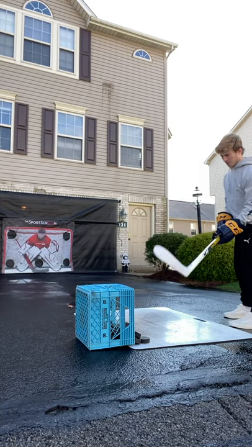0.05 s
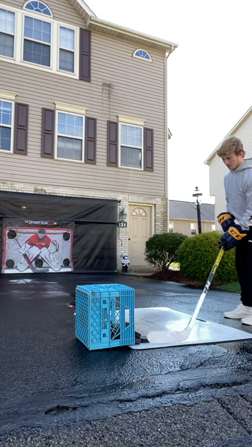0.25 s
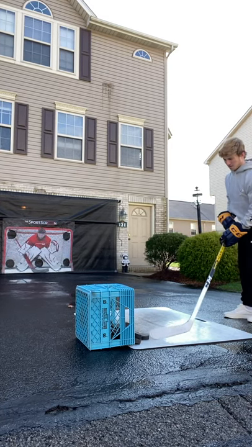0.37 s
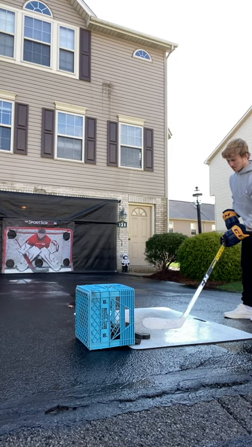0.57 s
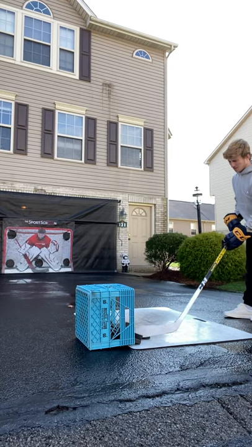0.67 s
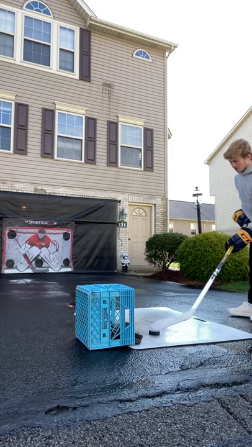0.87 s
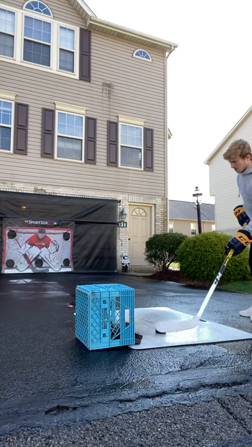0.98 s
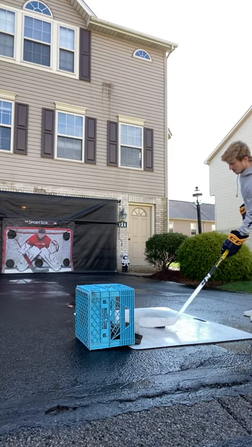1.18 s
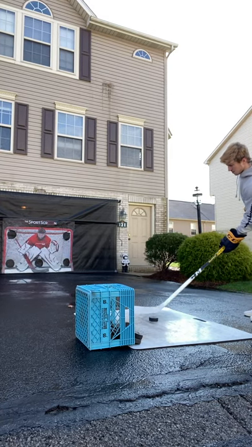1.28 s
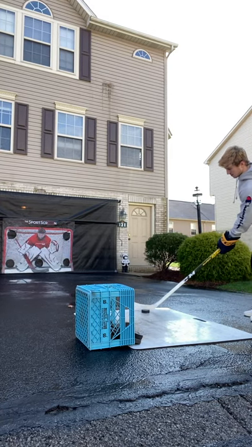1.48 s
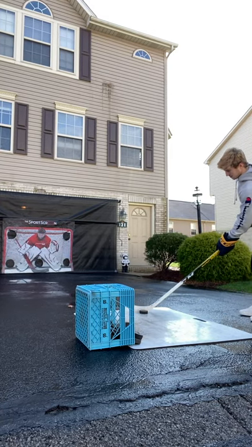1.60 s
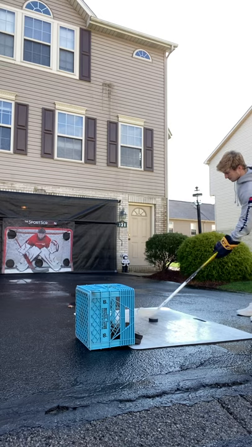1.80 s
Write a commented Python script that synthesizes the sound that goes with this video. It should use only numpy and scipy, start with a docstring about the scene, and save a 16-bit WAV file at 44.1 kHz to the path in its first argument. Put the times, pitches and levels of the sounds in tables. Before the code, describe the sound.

A hockey stick knocks a puck and a plastic pad about every half second, the blade scraping softly between hits. Each sharp knock echoes briefly off a house, over a low outdoor rumble on a driveway.

```python
"""Hockey stick on a driveway

A stereo pair outdoors, in front of a house. A stick knocks on a plastic pad and a puck: each knock is
a few quick pulses with a short ring of blade and shaft, and the house throws it back some 40 ms later.
Blade and puck scrape over the pad between knocks, above a low rumble, a soft thump and a puff of wind."""
import sys
import numpy as np
from scipy import signal
from scipy.fft import rfft, irfft
from scipy.io import wavfile
from scipy.ndimage import uniform_filter1d, minimum_filter1d

SR = 44100
rng = np.random.default_rng(int(sys.argv[2]) if len(sys.argv) > 2 else 0)


def store_wav(level_fs):
    """Save 16-bit WAV to argv[1]."""
    pcm = np.round(np.clip(np.atleast_2d(level_fs), -1, 1) * 32767)
    wavfile.write(sys.argv[1], SR, pcm.T.astype(np.int16))


N = 81585

# modes of the shaft (frequency [Hz], level [dB], t60 [s])
SHAFT_MODES = [(857, -35.5, 0.061), (1139, -34.5, 0.059), (1973, -35.5, 0.068), (2207, -49, 0.14),
               (2370, -47, 0.089), (3010, -41.5, 0.087)]
# course of the steady noises (time [s], scrape [dB], midrange [dB], rumble [dB])
NOISE_LEVELS = [(0.0, -42.5, -45, -44.5), (0.19, -48, -47, -47), (0.344, -43.5, -48.5, -47),
                (0.484, -52.5, -53.5, -50), (0.684, -60.5, -51.5, -48), (0.824, -53.5, -54, -44.5),
                (0.958, -43.5, -51.5, -50), (1.066, -61, -48, -48), (1.164, -47.5, -49.5, -56.5),
                (1.38, -45, -50, -48), (1.566, -38, -46, -57.5), (1.85, -43.5, -50.5, -45.5)]


def stick():
    """Knocks and touches reach the microphones directly and from the yard; knocks also off the house."""
    # (time [s], 8 band levels [dB], first rebound [s], its share, second rebound [s], its share,
    #  clatter [dB], its t60 [s], shaft ring [dB], brightness [factor], low ring [Hz], lift [dB],
    #  middle ring [Hz], lift [dB], top ring [Hz], lift [dB], echo delay [s], echo trim [dB])
    blows = [ (0.2185, 13, 14, 15.1, 11.5, 20.8, 11.2, 22.4, -4.5, 0.0016, 0.58, 0.003, 0.79, 1, 0.056, 2.5, 0.96, 912, 7.3, 2810, 7.1, 3750, 3.3, 0.04, 0.42),
             (0.6545, 14, 11.8, 15.5, 13.3, 12.3, 8.3, 14.5, -25.5, 0.001803, 0.46, 0.0026, 0.56, -0.5, 0.034, -15, 1.04, 1270, 2.2, 2310, 6.3, 6600, 8.3, .0455, 1.7),
             (1.031, 2.3, 1.7, 6.6, 4.7, 7, 11.9, 21.6, -9, 0.001496, 0.25, 0.0023, 0.6, -5, 0.039, -9, 1.002, 842, 11.2, 3180, 7, 6430, 10.4, 0.038, 0.76),
             (1.0946, 21.8, 13, 14.2, 14.8, 21.7, 14, 23.8, -17.5, 0.00265, 1.0, .0057, 0.69, -0.5, 0.02, -25, 0.92, 1225, 1.4, 2710, 4.9, 6000, 10.5, .045, -1.3),
             (1.4857, 13.5, 21.4, 25, 24, 13.9, 17.5, 22.1, -9.5, 0.0018, 0.55, 0.00272, 0.24, -5, 0.025, -18, 1.018, 734, 1.4, 2670, 8.5, 5540, 13.6, 0.036, -2.2)]
    # light touches of blade and puck (time [s], bass [dB], body [dB], treble [dB], t60 [s])
    touches = [(0.0655, -42, -1.5, -23.5, 0.014), (0.2254, 5.5, 15.5, -18, 0.022),
               (0.2330, -5, 15, -6, 0.051), (0.2660, -3.5, 4.5, -19, 0.04), (0.2900, 8, 3, -24, 0.098),
               (0.3160, -5, -2, -25, 0.03), (0.3325, -22, 3.5, -29, 0.031), (1.1395, -14, 2.5, -26, 0.027),
               (1.3980, -34, -0.5, -26.5, 0.054), (1.4220, -38, 2, -26, 0.025),
               (1.4478, -5, 8, -16.5, 0.041), (1.5254, 0, 7.5, -21.5, .03)]
    # phase between the microphones (frequency [Hz], lead of the left [rad])
    left_lead = [(340, 0.14), (950, 0.86), (1550, -0.95), (2330, -0.36), (3360, -1.37), (8000, -1.1)]
    knocks = [knock(row[:-2]) for row in blows]
    hits = sum(knocks) + sum(touch(*row) for row in touches)
    echoes = sum(sound * delay(row[-2]) * amp(row[-1]) for sound, row in zip(knocks, blows))
    direct = np.exp(.5j * np.outer([1, -1], read(left_lead, bins())))
    return irfft(hits * (direct + yard()) + echoes * house())[:, :N]


def knock(row, rebound_hz=4730, bend_s=0.001094):
    """A blow and two rebounds spread through the blade, with clatter; shaft and struck spot ring."""
    # bands of a knock's levels, the last standing for all the treble (frequency [Hz])
    band_hz = [200, 380, 570, 790, 1130, 1550, 2400, 5500]
    s, *levels, gap, share, gap2, share2, clatter_db, clatter_t60, ring_db, bright = row[:-6]
    low_hz, low_db, mid_hz, mid_db, top_hz, top_db = row[-6:]
    t, hz = np.arange(N) / SR, bins()
    shaft = sum(amp(db + ring_db) * decay(t, t60) * np.cos(2 * np.pi * f * t)
                for f, db, t60 in SHAFT_MODES)
    lows = 1 / (1 + (hz / rebound_hz) ** 4)
    crack = lows + (1 - lows) * burst(t60=0.0013)
    pulses = crack * (1 + lows * (share * delay(gap) + share2 * delay(gap2)))
    clatter = amp(clatter_db) * (lows + 0.34 * (1 - lows)) * burst(clatter_t60) * delay(gap)
    # bending waves: the lows arrive late, 2400 Hz on time
    spread = np.exp(-4j * np.pi * bend_s * np.sqrt(1000 * hz)) * delay(-bend_s * np.sqrt(1000 / 2400))
    tone = blade_tone(list(zip(band_hz[:-1], levels)), levels[-1], bright)
    spot = resonance(low_hz, low_db, 55) * resonance(mid_hz, mid_db, 100) * resonance(top_hz, top_db, 420)
    return tone * spot * spread * delay(s) * (pulses + rfft(shaft, 2 * N) + clatter)


def touch(s, bass_db, body_db, treble_db, t60):
    """A light scuff with a short ring of the puck."""
    tone = blade_tone([(400, bass_db), (1300, body_db - 7.5), (2400, body_db + 1.5)], treble_db)
    return tone * resonance(hz=2430, db=2.5, width_hz=110) * burst(t60) * delay(s)


def blade_tone(body, treble_db, bright=1, knee_hz=2670, knee_top_hz=3615, low_cut_hz=110):
    """Tone of a hit: a strong body, then a steep step down to a thin treble."""
    hz = np.fft.rfftfreq(8192, 1 / SR)
    step = np.clip((hz / bright - knee_hz) / (knee_top_hz - knee_hz), 0, 1)
    rolloff_db = -31.5 * np.log2(np.maximum(hz / 7810, 1))
    bite_db = 7.5 * np.exp(-((hz - 3670) / 480) ** 2)  # a bump at the foot of the treble
    level_db = (1 - step) * read(body, hz) + step * (treble_db + bite_db) + rolloff_db
    return causal(amp(level_db) * hz ** 2 / (hz ** 2 + low_cut_hz ** 2))


def scrape(slip_db=-4.5, sand_db=-7.5):
    """Blade and puck rub over the pad: grainy friction with tiny catches, and a sandy hiss."""
    # spectra of the friction and the hiss (frequency [Hz], density [dB])
    friction_spectrum = [(1000, -16.5), (1600, -4.5), (2000, -2.5), (2400, 0.5), (2850, -2.5), (3300, -15),
                         (4000, -26.5), (6000, -81), (14000, -85)]
    hiss_spectrum = [(2500, 1), (3500, 1.5), (4700, -1.5), (6500, 0.5), (8500, -4), (11700, -9.5),
                     (13000, -37)]
    # course of the hiss (time [s], level [dB])
    hiss_levels = [(0, -54.5), (.3, -60), (.45, -60.5), (.54, -79), (.64, -87), (.72, -60), (.82, -63.5),
                   (.93, -63), (1.01, -69.5), (1.07, -61.5), (1.45, -60), (1.85, -54.5)]
    # gritty strokes of the blade (time [s], half width [s], treble [dB], body [dB])
    strokes = [(0.158, 0.0051, -58, -44.5),  (0.403, 0.0077, -50, -52.5), (0.502, 0.014, -62, -49),
               (0.803, 0.035, -61.5, -42), (0.862, 0.0061, -76, -48.5), (1.265, 0.018, -55.5, -58)]
    body = fader(NOISE_LEVELS) + sum(amp(db) * swell(s, width) for s, width, _, db in strokes)
    treble = fader(hiss_levels) + sum(amp(db) * swell(s, width) for s, width, db, _ in strokes)
    grain = unit(uniform_filter1d(rng.standard_normal(N), size=260))
    friction = noise(friction_spectrum) + amp(slip_db) * grit(friction_spectrum, per_s=260, spread_db=6)
    hiss = noise(hiss_spectrum) + amp(sand_db) * grit(hiss_spectrum, per_s=860, spread_db=6.5)
    return through_shaft(friction) * body * amp(2 * grain) + hiss * treble * amp(1.87 * grain)


def grit(spectrum, per_s, spread_db):
    """Sparse tiny crackles under the blade, rms 1."""
    sizes = amp(spread_db * np.minimum(rng.exponential(1, N), 3))
    struck = rng.random(N) < per_s / SR
    return diffuse(sizes * struck * rng.choice([-1., 1.], (2, N)), spectrum)


def through_shaft(friction, width_hz=70, lift_db=4):
    """The shaft lifts friction noise at its modes, rms 1."""
    peaks = sum(1 / (1 + (2 * (bins() - hz) / width_hz) ** 2) for hz, _, _ in SHAFT_MODES)
    return unit(irfft(rfft(friction, 2 * N) * amp(lift_db * peaks))[:, :N])


def zips(centre_hz=5560, octaves_per_s=28, width_s=0.0097, db=-57.5):
    """Thin friction resonances glide upward as the blade gathers speed."""
    # middle of each zip (time [s])
    times = [0.051, .396, .468]
    t = np.arange(N) / SR
    glides = [centre_hz * 2 ** np.clip(octaves_per_s * (t - s), -1, 1) for s in times]
    tone = sum(swell(s, width_s) * np.exp(2j * np.pi * np.cumsum(hz) / SR) for s, hz in zip(times, glides))
    flutter = [unit(x) for x in uniform_filter1d(rng.standard_normal((2, 2, N)), size=70)]
    return amp(db) * (flutter[0] * tone.real + flutter[1] * tone.imag)


def house():
    """Response of the house front: a slap off the siding and a diffuse tail."""
    slap = amp(-26.5) * burst(t60=0.011)
    return slap + amp(-23.5) * pair([burst(t60=0.18), burst(t60=0.18)])


def yard(db=-21.5):
    """Response of the open yard: a thin tail, each band dying at its own speed."""
    # decay of the yard (frequency [Hz], t60 [s])
    decay_times = [(150, 0.12), (600, 0.63), (2300, 0.66), (5000, 0.055), (12000, 0.35)]
    hz, t, bands = signal.stft(rng.standard_normal((2, N)), SR, nperseg=256)
    tail = signal.istft(bands * decay(t, read(decay_times, hz)[:, None]), SR, nperseg=256)[1][:, :N]
    return amp(db) * pair(rfft(tail / np.linalg.norm(tail[0]), 2 * N))


def thump_and_wind(peak_hz=46):
    """A soft low thump, perhaps a footstep, then a puff of wind on the microphones."""
    # the thump, then the puff (time [s], half width [s], level [dB])
    low_swells = [(0.586, 0.0094, -40.5), (0.812, 0.053, -38.5)]
    low_noise = noise([(18, -20), (peak_hz, 0), (85, -10), (200, -23), (900, -100)])
    return low_noise * sum(amp(db) * swell(s, width) for s, width, db in low_swells)


def outdoors(rumble_lift_db=1):
    """Background of the driveway: a soft midrange rush over a low rumble."""
    # spectra of the rush and the rumble (frequency [Hz], density [dB])
    rush_spectrum = [(100, -19.5), (200, -1), (400, -7.5), (600, -3), (1100, -0.5), (1600, -13.5),
                     (3000, -14.5), (5000, -31.5), (14000, -79)]
    rumble_spectrum = [(15, 0), (35, -32), (60, 4), (90, 0.5), (122, 4), (160, -5.5), (250, -11.5),
                       (500, -62), (4000, -110)]
    rush = noise(rush_spectrum) * fader(NOISE_LEVELS, column=2)
    rumble = noise(rumble_spectrum) * fader(NOISE_LEVELS, column=3)
    return rush + rumble * amp(rumble_lift_db)


def hum():
    """A faint low hum swells and fades."""
    # tones of the hum (frequency [Hz], level [dB])
    tones = [(67, -44), (118, -43.5)]
    t = np.arange(N) / SR
    drone = sum(amp(db) * np.sin(2 * np.pi * (hz * t + rng.random())) for hz, db in tones)
    return drone * swell(s=0.37, width=0.071)


def pair(spectra):
    """Makes two unrelated spectra as alike as diffuse sound is at the two microphones."""
    # likeness of left and right (frequency [Hz], coherence [0 to 1])
    coherence = [(110, 1), (330, 0.98), (600, 0.6), (1000, 0.29), (1800, 0.88), (3200, 0.23), (8000, 0.13)]
    same = read(coherence, bins())
    return np.array([spectra[0], same * spectra[0] + np.sqrt(1 - same ** 2) * spectra[1]])


def diffuse(x, spectrum):
    """Colours two unrelated signals and spreads them over the microphones, rms 1."""
    return unit(irfft(pair(rfft(x, 2 * N)) * amp(read(spectrum, bins())))[:, :N])


def noise(spectrum):
    """Coloured stereo noise, rms 1."""
    return diffuse(rng.standard_normal((2, 2 * N)), spectrum)


def burst(t60):
    """Spectrum of a dying shower of tiny pulses, energy 1."""
    shower = rng.standard_normal(N) * decay(np.arange(N) / SR, t60)
    return rfft(shower / np.linalg.norm(shower), 2 * N)


def resonance(hz, db, width_hz):
    """Lifts one frequency and lets it ring."""
    return 1 + (amp(db) - 1) / (1 + 2j * (bins() - hz) / width_hz)


def causal(gain):
    """Gives a gain curve the phase of a body that rings only after it is struck."""
    log = np.log(np.maximum(gain, 1e-5))
    spectrum = np.exp(np.conj(signal.hilbert(np.concatenate([log, log[-2:0:-1]]))))
    return rfft(irfft(spectrum[:len(gain)]), 2 * N)


def delay(s):
    """Spectrum of a delay."""
    return np.exp(-2j * np.pi * bins() * s)


def decay(t, t60):
    """Falls 60 dB in t60 seconds."""
    return np.exp(-np.log(1000) * t / t60)


def swell(s, width):
    """A bell-shaped rise and fall."""
    return np.exp(-.5 * ((np.arange(N) / SR - s) / width) ** 2)


def fader(points, column=1):
    """Gain over time from a table's column of decibels."""
    columns = np.transpose(points)
    return amp(np.interp(np.arange(N) / SR, columns[0], columns[column]))


def read(points, hz):
    """Reads a table on a log-frequency axis."""
    f, value = np.transpose(points)
    return np.interp(np.log(hz + 1), np.log(f + 1), value)


def bins():
    """Frequencies of a double-length spectrum."""
    return np.fft.rfftfreq(2 * N, 1 / SR)


def amp(db):
    """Decibels to gain."""
    return 10 ** (np.asarray(db) / 20)


def unit(x):
    """Scales to rms 1."""
    return x / np.sqrt(np.mean(x ** 2) + 1e-20)


def scene():
    """All sources at the microphones, leaning left or right by frequency."""
    # stereo balance (frequency [Hz], left minus right [dB])
    balance = [(110, 0), (270, -2), (440, -4), (720, -5.5), (1180, 0.5), (1940, 4.5), (3000, 1.5),
               (3700, -2), (5500, 4), (9000, -0.5)]
    mix = stick() + scrape() + outdoors() + zips() + thump_and_wind() + hum()
    lean = amp(.5 * np.outer([1, -1], read(balance, bins())))
    return irfft(rfft(mix, 2 * N) * lean)[:, :N]


def record(dry, ceiling=.97, limiter_s=.0012, edge_hz=15800):
    """A fast limiter holds the loudest knocks under full scale; then the band limit."""
    size = round(limiter_s * SR) | 1
    gain = minimum_filter1d(ceiling / np.maximum(abs(dry).max(0), ceiling), 2 * size + 1)
    held = dry * uniform_filter1d(uniform_filter1d(gain, size), size)
    lowpass = signal.firwin(511, edge_hz, window=("kaiser", 9), fs=SR)
    return signal.oaconvolve(held, lowpass[None], "same")


dry = scene()
out = record(dry)
store_wav(out)
```